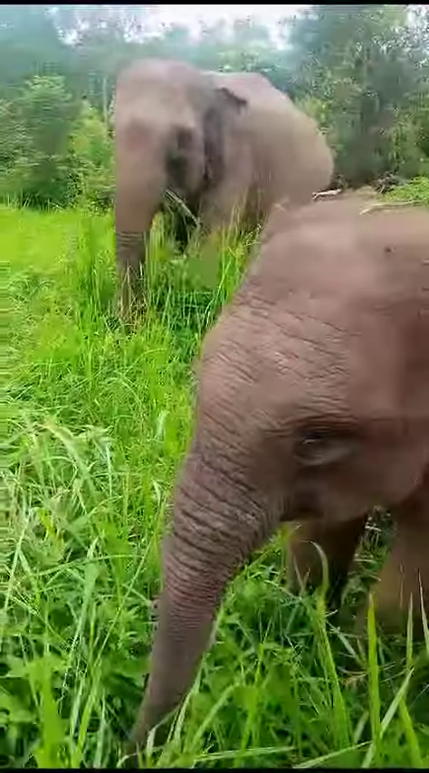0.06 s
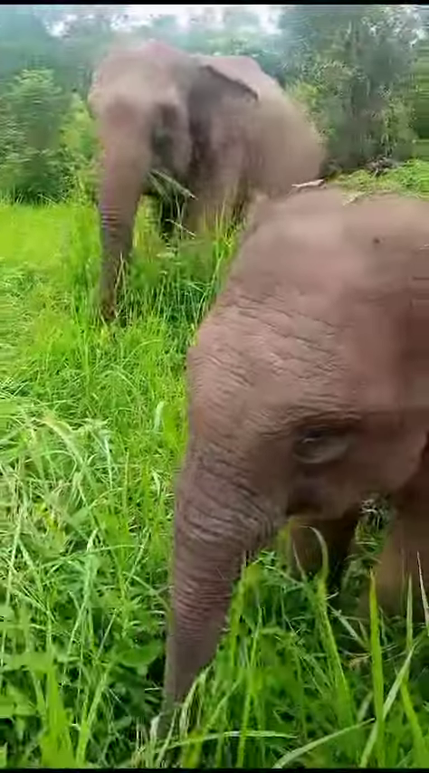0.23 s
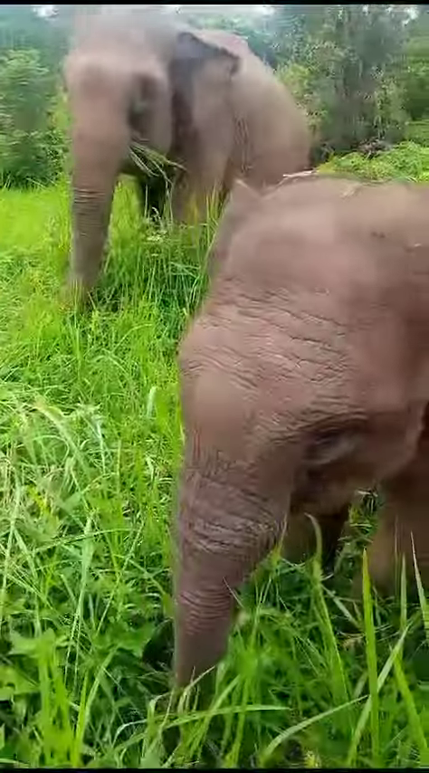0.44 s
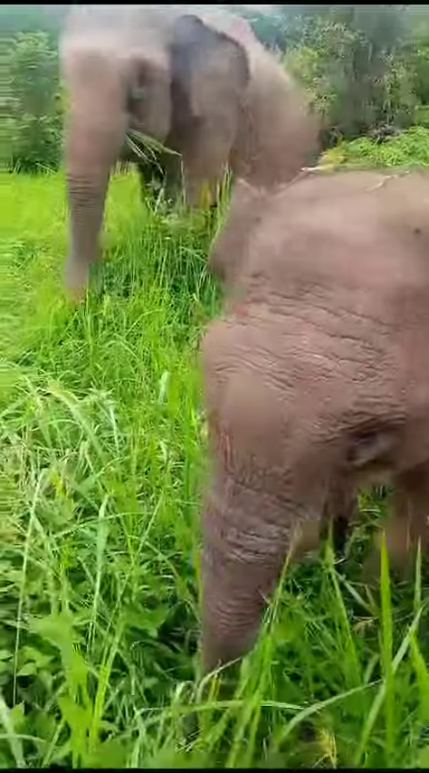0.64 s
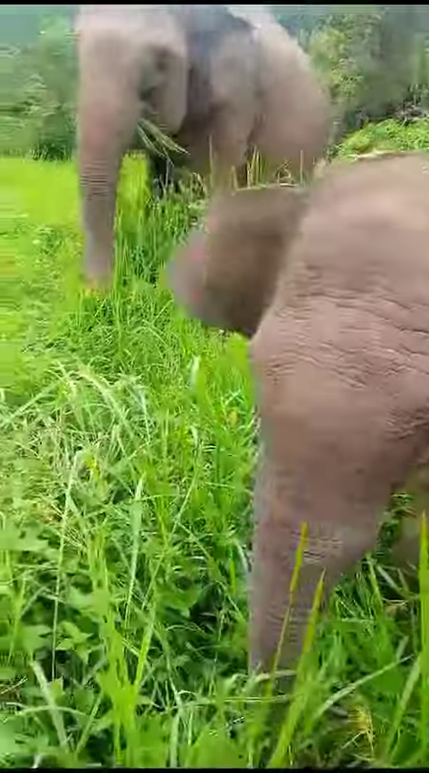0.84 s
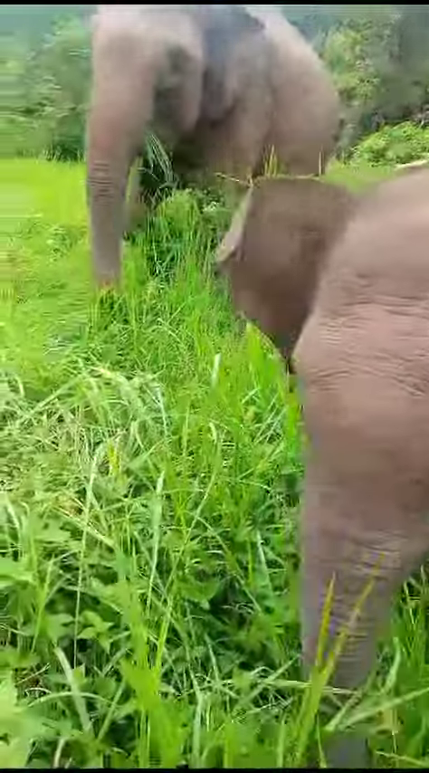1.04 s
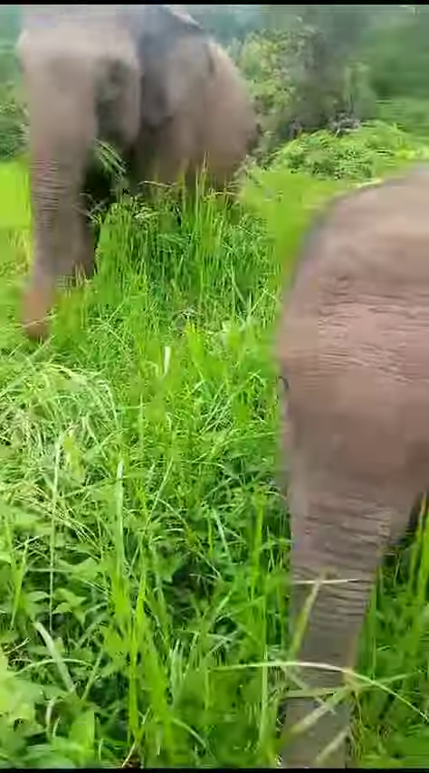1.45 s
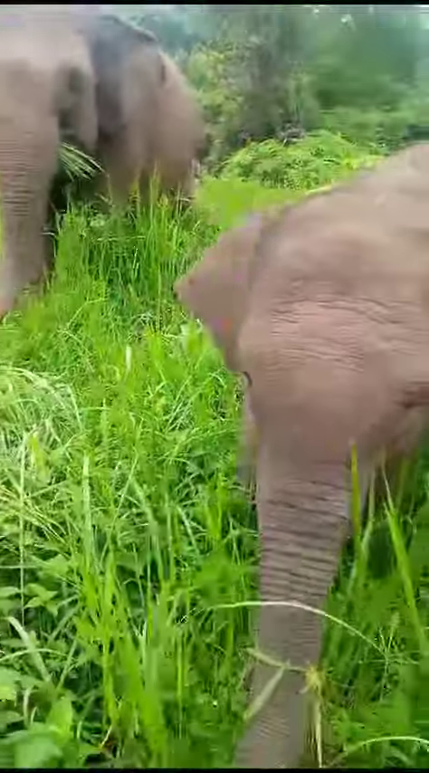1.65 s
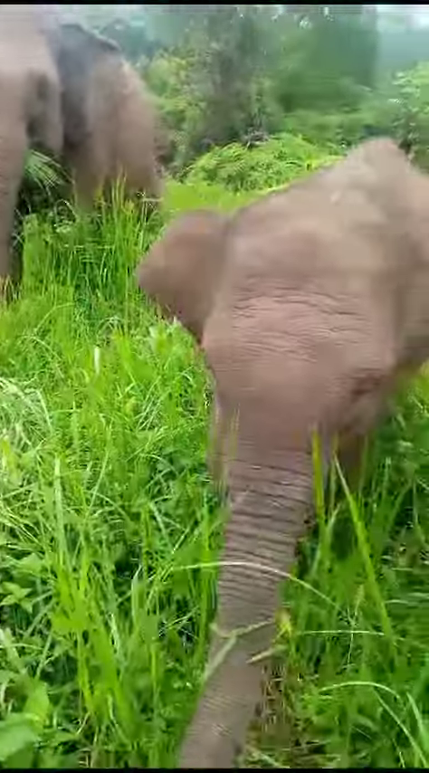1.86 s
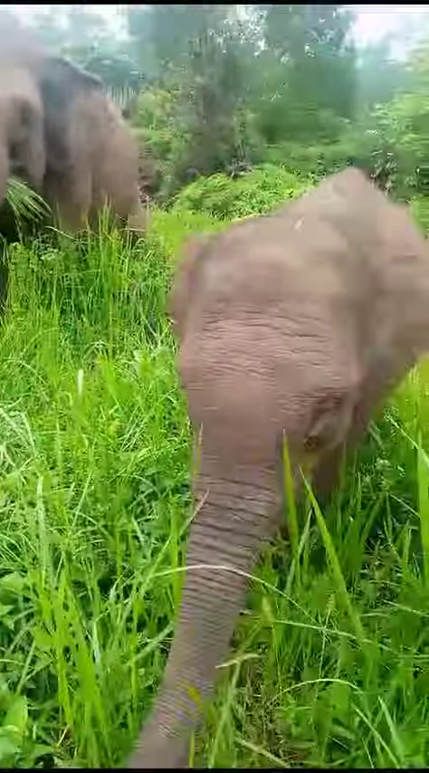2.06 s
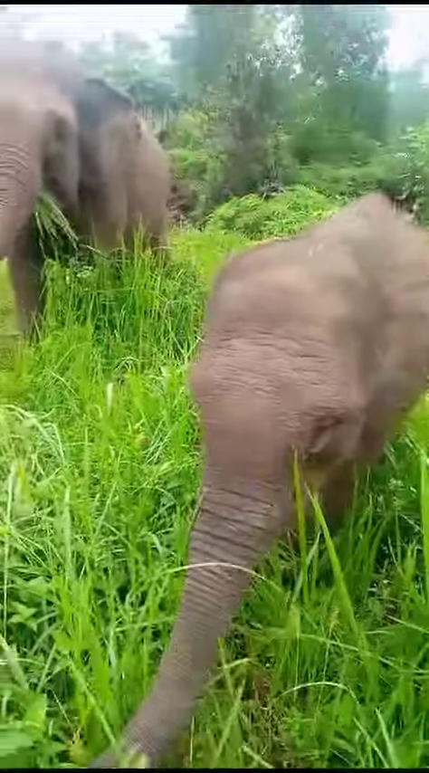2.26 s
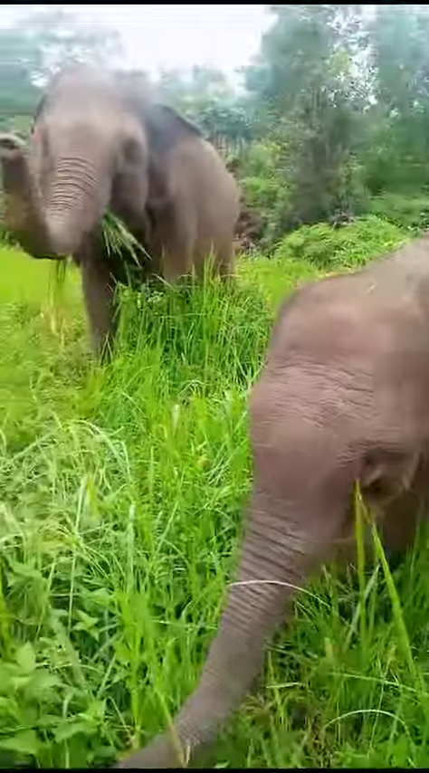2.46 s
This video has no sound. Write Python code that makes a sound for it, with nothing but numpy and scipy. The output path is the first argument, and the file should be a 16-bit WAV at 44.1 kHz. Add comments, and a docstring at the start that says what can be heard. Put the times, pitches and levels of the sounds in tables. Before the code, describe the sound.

Tall grass swishes and crackles close by as a young elephant wades through, with soft stalk snaps and dull scuffs. The rustle builds, peaks around 1.2 seconds and fades by 2.5. A low gust brushes the microphone from about 0.9 to 1.3 seconds. A distant bird gives short, high chips in the first 0.4 seconds and again near 2.3, over a faint insect trill and airy hiss.

```python
"""A young elephant wades through tall grass in an open field, close to a mono microphone.
Blades swish and crackle as they slide over its hide, thicker stalks crush and snap,
and its feet and trunk make dull scuffs. A gust brushes the microphone over a faint hiss of air.
Far off, an insect trills (throbbing noise) and a small bird gives short, high, falling chips."""
import sys
import numpy as np
from scipy import signal
from scipy.fft import rfft, irfft
from scipy.io import wavfile
from scipy.ndimage import uniform_filter1d

SR = 44100
rng = np.random.default_rng(int(sys.argv[2]) if len(sys.argv) > 2 else 0)


def output_pcm(signal):
    """Save a mono or channel-first signal as 16-bit PCM at the path in sys.argv[1].

    Samples are clipped to [-1, 1] before scaling.
    """
    pcm = np.clip(np.atleast_2d(signal).T, -1, 1) * 32767
    wavfile.write(sys.argv[1], SR, np.round(pcm).astype(np.int16))


N = 110250
TIME = np.arange(N) / SR

# How the rustle swells and fades as the elephant moves: time_s, blades_db, stalks_db
RUSTLE_LEVELS = [(0, -56, -73), (.16, -59, -75.5), (.27, -53.5, -72.5), (.41, -53.5, -65.5),
                 (.5, -52.3, -63.5), (.68, -51.5, -64), (.76, -50.5, -60.5), (1.02, -45, -56),
                 (1.08, -41.5, -54.5), (1.18, -39.5, -53.5), (1.24, -41.5, -54), (1.3, -45, -57.5),
                 (1.55, -45.5, -59), (1.63, -45.5, -56.5), (1.69, -49.5, -62), (1.78, -52.5, -64.5),
                 (2.2, -54.5, -65.5), (2.31, -59.5, -76), (2.5, -63.5, -84)]
# Tone of the sliding blades: frequency_hz, gain_db
BLADE_TONE = [(1500, -40), (2600, -19), (3900, -20), (4400, -10.5), (4650, -1.5), (4850, -2), (5150, -2.5),
              (5550, -0.4), (6200, -2.7), (7150, 2), (7700, -1.5), (8400, -9), (10000, -16.5),
              (11800, -18.5), (13900, -19), (14700, -2), (15700, -7)]
# Tone of the crushed stalks: frequency_hz, gain_db
STALK_TONE = [(100, -26), (300, -17.5), (600, -9), (850, -1.5), (1130, 2.5), (1420, -4.5), (1750, -1.5),
              (2250, 0), (2550, -4), (3000, -3), (3600, -2), (4300, 1), (6500, -27.5)]
# Tone of the air over the field: frequency_hz, gain_db
AIR_TONE = [(20, -24), (60, -8), (130, -2.5), (250, -7.5), (600, -12.5), (1050, -9.5), (1500, -13),
            (2100, -6), (2700, 2), (4200, 7), (6500, 0.5), (9000, -2), (15000, -8)]
# Single stalks snapping: start_s, centre_hz, level_db
STALK_CRACKS = [(.008, 2740, -55.5), (.343, 780, -61), (1.417, 900, -60), (1.508, 620, -58),
                (1.685, 480, -61), (1.867, 654, -64.5), (2.142, 950, -67), (2.205, 5000, -51),
                (2.385, 960, -67.5)]
# The bird's calls: start_s, middle_pitch_hz, level_db
BIRD_CHIPS = [(.129, 7420, -50), (.241, 7430, -49.5), (0.349, 7470, -47.5), (2.234, 7410, -51.5),
              (2.343, 7520, -50.5), (2.381, 7500, -56.5)]
# Scuffs and footfalls in the grass: start_s, fade_s, centre_hz, level_db
SCUFF_PUFFS = [(0.214, 0.044, 478, -72), (0.273, 0.11, 330, -72), (0.417, .11, 287, -65.5),
               (0.501, 0.064, 143, -71.5), (0.545, 0.099, 270, -71), (.65, 0.56, 283, -67),
               (0.735, 0.12, 684, -63.5), (0.83, 0.14, 152, -67.5), (1.057, .12, 310, -62),
               (1.385, 0.093, 340, -62.5), (1.448, .06, 125, -73.5), (1.471, 0.052, 360, -59.5),
               (1.59, 0.14, 500, -66.5), (1.661, 0.12, 300, -67), (1.825, 0.021, 85, -76),
               (1.841, 0.043, 378, -66), (2.04, 0.082, 90, -67), (2.15, 0.066, 363, -75),
               (2.326, 0.053, 110, -89)]
# Tone of the gust on the microphone: frequency_hz, gain_db
GUST_TONE = [(20, -24), (35, -24), (52, -10), (80, -2), (130, -1), (200, -3.5), (300, -6.5), (600, -14),
             (1000, -23), (3000, -69)]
# How the gust rises and dies away: time_s, level_db
GUST_LEVELS = [(0, -94), (.4, -89), (.8, -78), (.92, -67.5), (.955, -59.5), (1.12, -57.5), (1.25, -58.5),
               (1.32, -61.5), (1.38, -75), (1.6, -90), (2.5, -100)]


def amp(db):
    """Turns decibels into a number to multiply by."""
    return 10 ** (np.asarray(db) / 20)


def unit(x):
    """Scales a signal to an average strength (rms) of 1."""
    return x / np.sqrt(np.mean(x ** 2) + 1e-20)


def curve(table, column=1):
    """Joins the points of a time table with straight lines."""
    rows = np.array(table)
    return np.interp(TIME, rows[:, 0], rows[:, column])


def colour(x, tone):
    """Filters a sound by a tone table, then scales it to strength 1."""
    hz, db = np.transpose(tone)
    gain_db = np.interp(np.log(np.fft.rfftfreq(N, 1 / SR) + 1), np.log(hz), db)
    return unit(irfft(rfft(x) * amp(gain_db), N))


def band(centre_hz, octaves):
    """Noise that is strongest at one frequency and fades to either side."""
    away = np.log2((np.fft.rfftfreq(N, 1 / SR) + 1) / centre_hz) / octaves
    return unit(irfft(rfft(rng.standard_normal(N)) * np.exp(-.5 * away ** 2), N))


def wander(rate_hz):
    """A random wobble, mostly between 5 Hz and the given rate."""
    hz = np.fft.rfftfreq(N, 1 / SR)
    return unit(irfft(rfft(rng.standard_normal(N)) * (hz > 5) / (1 + (hz / rate_hz) ** 2), N))


def patchy(x, depth_db, width_hz, length_s):
    """Lets random patches of low and high sound swell and sink."""
    spectra = signal.stft(x, nperseg=256)[2]
    swell = rng.standard_normal(spectra.shape)
    swell = uniform_filter1d(swell, max(1, round(width_hz * 256 / SR)), axis=0)
    swell = uniform_filter1d(swell, max(1, round(length_s * SR / 128)), axis=1)
    return signal.istft(spectra * amp(depth_db * unit(swell)), nperseg=256)[1][:N]


def clicks(per_s, spread_db):
    """Tiny random clicks, a few stronger than the rest."""
    size = amp(spread_db * np.minimum(rng.exponential(1, N), 5))
    return unit(size * rng.choice([-1, 1], N) * (rng.random(N) < per_s / SR))


def sliding_blades():
    """Blades slide over hide and each other: they hiss and crackle, brighter when pushed harder."""
    level_db = curve(RUSTLE_LEVELS)
    crackle = unit(clicks(per_s=4500, spread_db=3) * amp(1.43 * wander(rate_hz=55)))
    rubbing = amp(-2.5) * rng.standard_normal(N) + amp(-7) * crackle
    rubbing = patchy(rubbing, depth_db=.5, width_hz=1500, length_s=.018)  # blades take turns
    swish = colour(rubbing, BLADE_TONE)
    treble = signal.sosfiltfilt(signal.butter(4, 9000, "high", fs=SR, output="sos"), swish)
    brighten_db = .058 * (level_db - level_db.mean())
    swish += treble * (amp(brighten_db) - 1)
    flutter_db = .42 * wander(rate_hz=49)
    return swish * amp(level_db + 3 + flutter_db)


def crushing_stalks():
    """Thicker stalks bend and crush: a lower, grainy rustle that gains body under a hard push."""
    level_db = curve(RUSTLE_LEVELS, column=2)
    grains = clicks(per_s=2200, spread_db=1.5) + .77 * rng.standard_normal(N)
    echo_delay_s = .001549  # a nearby reflection makes the stalks sound hollow
    hollow = grains - .13 * np.interp(TIME - echo_delay_s, TIME, grains)
    crush = colour(patchy(hollow, depth_db=2, width_hz=350, length_s=.08), STALK_TONE)
    peak_db = level_db.max()
    body_db = peak_db - 10 + 1.58 * (level_db - peak_db)  # grows faster than the rustle
    body = band(centre_hz=457, octaves=.82) * amp(body_db)
    flutter_db = .6 * wander(rate_hz=9.7)
    return body + crush * amp(level_db + 1.5 + flutter_db)


def field_air():
    """The faint, shifting hiss of the open field."""
    hiss = patchy(rng.standard_normal(N), depth_db=2.5, width_hz=350, length_s=.1)
    return amp(-62) * colour(hiss, AIR_TONE)


def insect(pitch_hz=7420, width_hz=240, level_db=-62):
    """A far insect trills: a thin band of noise that throbs unevenly."""
    throbs_per_s = 55 * (1 + .16 * wander(rate_hz=29))
    throb = 1 + .59 * np.sin(2 * np.pi * np.cumsum(throbs_per_s) / SR)
    thin_noise = band(pitch_hz, octaves=np.log2(1 + width_hz / pitch_hz))
    return amp(level_db) * unit(thin_noise * throb)


def snapping_stalks(rise_s=.00087, decay_s=.012):
    """Single stalks give way, each with a short, damp crunch."""
    out = np.zeros(N)
    for start_s, centre_hz, level_db in STALK_CRACKS:
        age_s = np.maximum(TIME - start_s, 0)
        shape = np.minimum(age_s / rise_s, 1) * np.exp(-age_s / decay_s)
        out += amp(level_db) * band(centre_hz, octaves=.5) * shape
    return out


def bird(length_s=.017, fall_hz_per_s=30000):
    """A small bird gives very short falling whistles, blurred by the distance."""
    out = np.zeros(N)
    for start_s, middle_pitch_hz, level_db in BIRD_CHIPS:
        progress = np.clip((TIME - start_s) / length_s, 0, 1)
        pitch_hz = middle_pitch_hz - fall_hz_per_s * length_s * (progress - .5)
        whistle = np.sqrt(2) * np.sin(2 * np.pi * np.cumsum(pitch_hz) / SR)
        blur = 1 + .25 * wander(rate_hz=210)
        out += amp(level_db) * np.sin(np.pi * progress) * whistle * blur
    return out


def scuffs(rise_s=.015):
    """Each push of a foot or the trunk gives a soft, dull puff."""
    out = np.zeros(N)
    for start_s, fade_s, centre_hz, level_db in SCUFF_PUFFS:
        age_s = np.maximum(TIME - start_s, 0)
        rise = np.minimum(age_s / rise_s, 1)
        fade_db = -8 * (age_s / fade_s) ** 2
        out += band(centre_hz, octaves=.36) * rise * amp(level_db + fade_db)
    return out


def gust():
    """Wind brushes the microphone with a low, lumpy rumble."""
    rumble = colour(rng.standard_normal(N), GUST_TONE)
    lumps_db = wander(rate_hz=19)
    return rumble * amp(curve(GUST_LEVELS) + lumps_db)


def scene():
    """Adds up all the sounds, the same in both channels."""
    mix = sliding_blades() + crushing_stalks() + field_air() + insect()
    mix += snapping_stalks() + bird() + scuffs() + gust()
    return np.tile(mix, (2, 1))


def record(dry, cutoff_hz=15750):
    """A steep filter cuts off the very highest treble."""
    low_pass = signal.firwin(1023, cutoff_hz, window=("kaiser", 9), fs=SR)
    return signal.oaconvolve(dry, low_pass[None], "same")


dry = scene()
out = record(dry)
output_pcm(out)
```